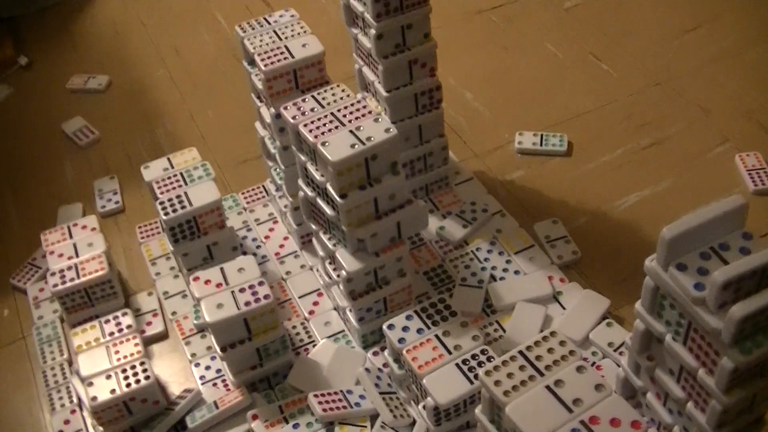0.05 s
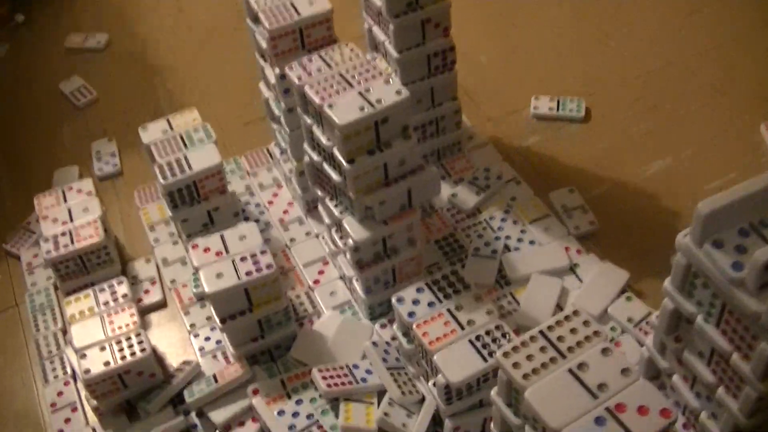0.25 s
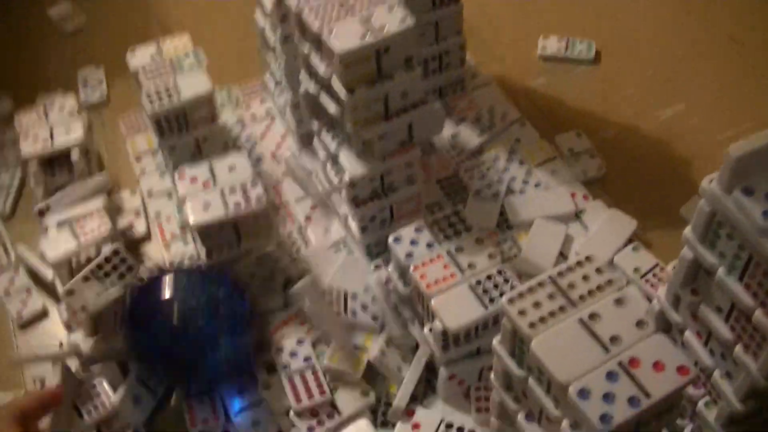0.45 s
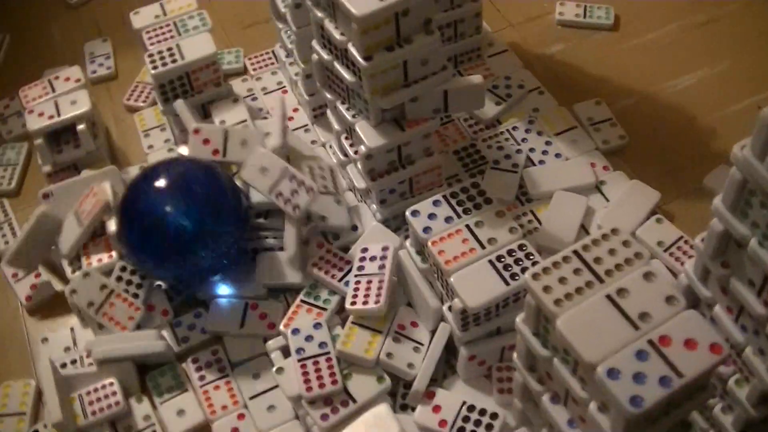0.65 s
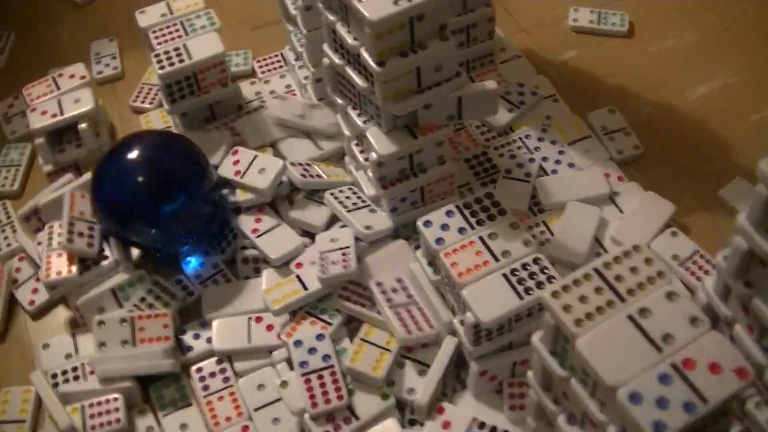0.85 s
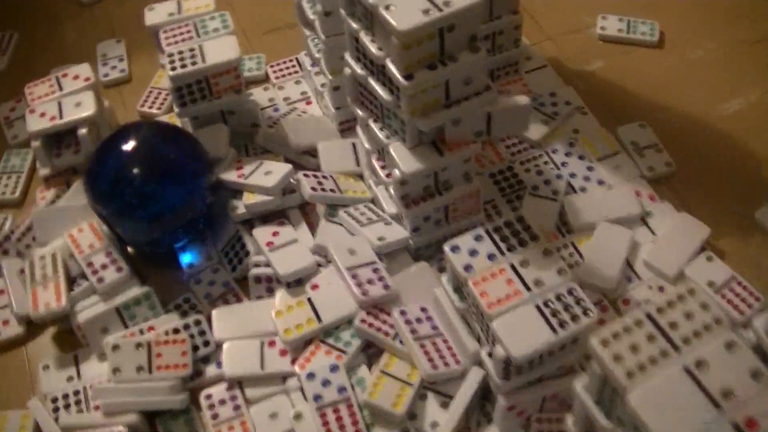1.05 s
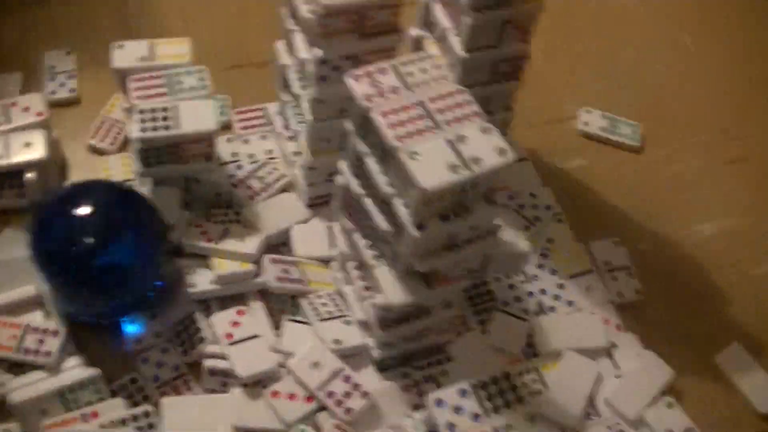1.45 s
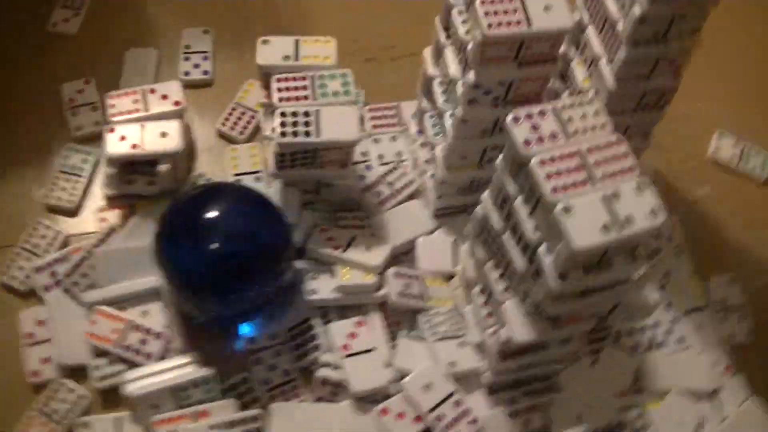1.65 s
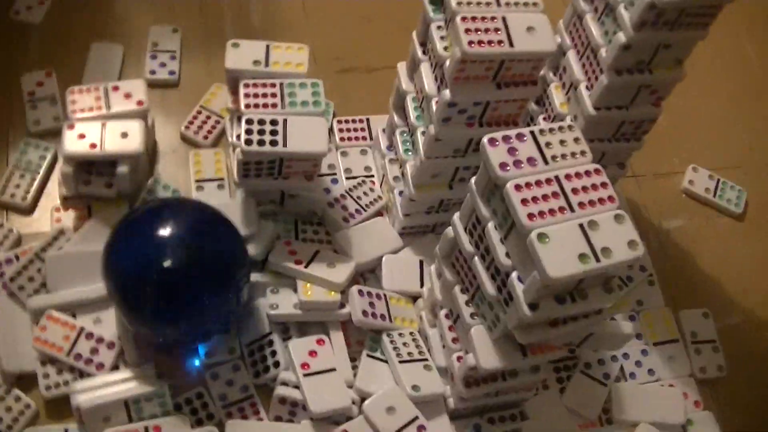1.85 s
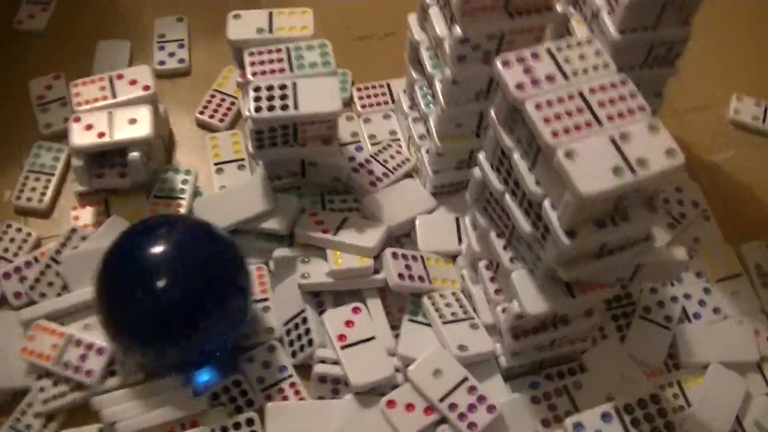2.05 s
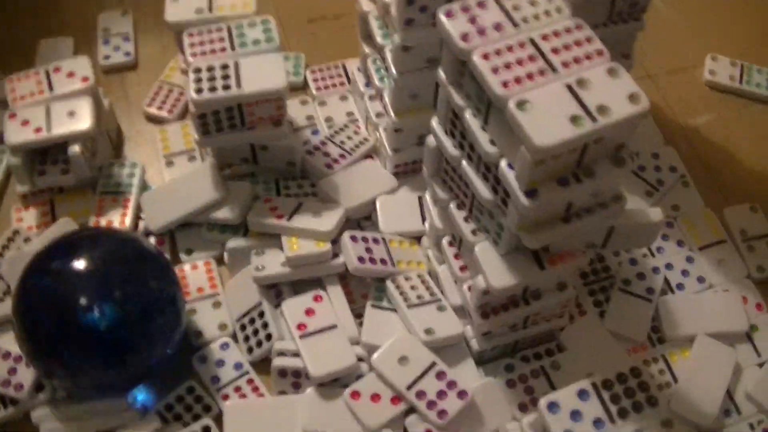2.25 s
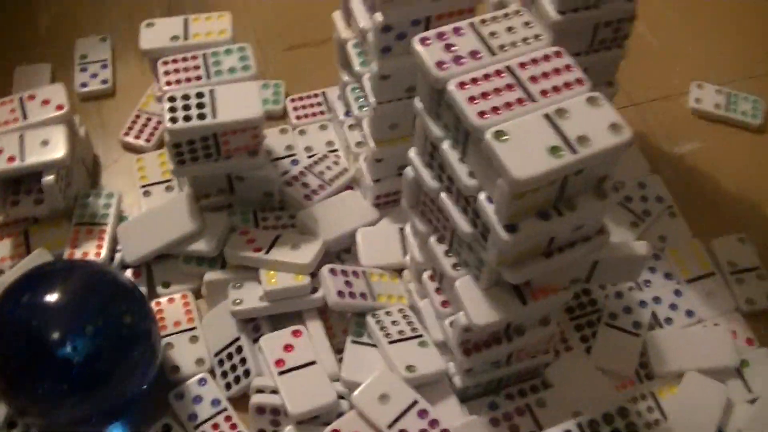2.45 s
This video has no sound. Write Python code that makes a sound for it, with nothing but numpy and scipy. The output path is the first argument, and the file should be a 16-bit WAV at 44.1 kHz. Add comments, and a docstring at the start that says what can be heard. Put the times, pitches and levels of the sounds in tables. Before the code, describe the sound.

Dominoes topple close by in a small room, starting with a few clicks and the low thud of a heavy ball at about 0.2 seconds. A dense, sharp clatter on the hard floor follows, thinning to separate clacks by 1.7 seconds. From 1.9 to 2.2 seconds a second stack falls with a thud. One stray tile clacks at 2.3 seconds, and a faint click follows near 2.6.

```python
"""A heavy ball is knocked into stacks of dominoes on a hard floor, close by in a small room.
First the blow excites the floor's low modes, and the stacks collapse in a dense clatter: each impact
radiates a broadband crack, the tiles ring at their high resonances and the room reverberates briefly.
The clatter thins to single clacks. At about 2 s a second stack falls with a thud; a few last tiles drop."""
import sys
import numpy as np
from scipy import signal
from scipy.fft import rfft, irfft
from scipy.io import wavfile

SR = 44100
rng = np.random.default_rng(int(sys.argv[2]) if len(sys.argv) > 2 else 0)


def pcm_store(signal):
    """Save signal as 16-bit PCM."""
    levels = np.round(np.clip(np.atleast_2d(signal), -1, 1) * 32767)
    wavfile.write(sys.argv[1], SR, levels.astype(np.int16).T)


N = 114660
TIME = np.arange(N) / SR
FREQUENCIES = np.fft.rfftfreq(N, 1 / SR)

# spectrum of the background hiss: (frequency [Hz], level [dB])
HISS_SPECTRUM = [(25,-9.5),(60,-0.5),(150,-1),(700,-19.5),(1500,-15.5),(3500,-9),(8000,-19),(16000,-22.5)]
# likeness of left and right in the direct sound: (frequency [Hz], correlation [-])
DIRECT_CORRELATION = [(150,0.51),(1300,1),(5000,0.94),(7000,0.65),(12000,0.05)]
# the same in the diffuse field: (frequency [Hz], correlation [-])
DIFFUSE_CORRELATION = [(150,0.93),(1400,1),(3000,0.75),(5000,0.91),(7000,0.23),(10000,0.72)]
# frequency response of the reverberation: (frequency [Hz], gain [dB])
ROOM_RESPONSE = [(1200,-6),(2400,1.5),(5800,0),(6600,-11),(8300,5),(10000,-5.5),(15000,-3)]
# bands of the impacts and the reverberation: (edge frequency [Hz])
BAND_EDGES = [150,400,850,1400,1950,2900,4000,5200,6500,7900,9300,12000,16500]
# envelope of the floor's rumble under ball and tiles: (time [s], level [dB])
RUMBLE_ENVELOPE = [(0,-70),(.15,-53),(.23,-41.5),(.42,-45.5),(.68,-69),(.76,-51),(1,-58.5),(1.93,-66.5),(2.02,-50.5),(2.17,-55.5),(2.32,-65.5),(2.6,-84.5)]
# spectrum of that rumble: (frequency [Hz], level [dB])
FLOOR_SPECTRUM = [(40,-34),(100,-15.5),(170,-0.5),(260,-5),(450,-9.5),(1200,-12.5),(4000,-65)]
# normal modes of the floor: (frequency [Hz], level [dB], T60 [s])
FLOOR_RESONANCES = [(154.5,-6.5,0.38),(188.3,-5.5,0.16),(243.4,-3,0.15),(298,-1.5,0.058),(379,-1,0.061),(529,3,0.032),(760,-6.5,0.029)]
# blows of the ball and falling stacks on the floor: (time [s], level [dB], extra knock [dB])
FLOOR_BLOWS = [(.234,-27,-14),(.275,-31.5,0.5),(0.323,-48.5,10),(0.739,-46,2.5),(1.839,-61,-9.5),(2.067,-30.5,4.5),(2.091,-41,3),(2.573,-51,-9)]
# weighting of the extra knock: (frequency [Hz], share [-])
KNOCK_WEIGHT = [(250,0.029),(400,1)]
# clustered resonances of loose tiles: (frequency [Hz], width [Hz], level [dB])
TILE_RESONANCES = [(4830,90,-9.5),(6996,186,-1),(8130,220,-2.5)]
# weighting of an impact's extra body: (frequency [Hz], share [-])
BODY_WEIGHT = [(2600,1),(4200,0)]
# weighting of an impact's extra brightness: (frequency [Hz], share [-])
BRIGHT_WEIGHT = [(5500,0.081),(7500,1),(9000,0.51),(13000,0.79)]
# course of the collapse: (time [s], level [dB], extra brightness [dB])
COLLAPSE_ENVELOPE = [(0,-61.5,2),(.07,-55.5,-8),(.11,-41,-2),(.155,-42,5),(.18,-29.5,-1),(.27,-31,3),(.31,-23,-8),(.335,-27,13),(.5,-22,3.5),(.66,-23.5,10),
                     (.87,-20.5,3),(1.0,-23.5,1),(1.09,-25,-6),(1.2,-25.5,1.5),(1.34,-30.5,-4),(1.48,-33.5,-10),(1.62,-48.5,-2),(1.668,-34.5,-13),(1.678,-33,16),(1.72,-40,3),(1.78,-56,3),
                     (1.9,-47,-13),(1.94,-29.5,-9),(2.04,-29.5,-11),(2.09,-25.5,0),(2.15,-36,-9),(2.2,-33.5,-10),(2.24,-80.5,-2),(2.6,-83,-7)]
# spectrum of a collision in the tumbling mass: (frequency [Hz], spectral density level [dB])
COLLAPSE_SPECTRUM = [(250,-25),(600,-19.5),(1100,-16),(1650,-10),(2400,-5.5),(3400,-2.5),(4600,0.5),(5800,3),(7200,-6),(8600,-9.5),(10700,-17),(14000,-27.5)]
# nearby tiles striking: (time [s], level [dB], extra body [dB], extra brightness [dB])
NEAR_IMPACTS = [(0.1254,-51,9.5,2),(0.1698,-35.5,9,1),(0.2308,-22,-2,0),(0.2756,-14.5,-13,-2.5),(0.2846,-14.5,-5,-8),(0.3101,-11,-9.5,-2),(0.3225,-17,4.5,8),
                (0.3811,-13.5,-31,-2),(0.389,-16,-18,-5),(0.4007,-13,-5,-3),(0.4204,-18.5,0,-5),(0.441,-15.5,-1,-1),(0.4586,-17,-24,-6),(0.4622,-16,-25,7),(.506,-21.5,6.5,14),(0.5182,-18,-5,6),
                (0.6171,-14.5,-9,-17),(0.7308,-24.5,9.5,10),(0.7892,-20.5,0,1),(0.9181,-13,-2.5,-3),(0.9565,-15.5,-6,-2),
                (0.9838,-22.5,-21,11),(1.0011,-20,-1,7),(1.0206,-12.5,-2,-19),(1.0527,-15,-1,0.5),(1.08,-25,-21,7),(1.092,-22,-4,-11),
                (1.1076,-16.5,1,-1.5),(1.136,-23,3,3),(1.1464,-18,-2.5,7),(1.152,-17,-2,5),(1.158,-17.5,-5,5.5),(1.1753,-15.5,-3.5,-14),(1.1908,-14.5,-4,-3),(1.2144,-17.5,0.5,-1),
                (1.248,-15.5,-2.5,2.5),(1.278,-18.5,0,7),(1.31,-18.5,-1,1),(1.3207,-17,0.5,-0.5),(1.3715,-14,-6.5,-9.5),
                (1.397,-22.5,-1,-9),(1.41,-15.5,-5.5,-5),(1.4447,-17,-8,-6),(1.4682,-24.5,-2.5,2),(1.5101,-30.5,-1,0.5),(1.522,-30.5,0,-4),(1.5497,-25,1.5,-13),
                (1.5665,-14.5,-4.5,-6),(1.6395,-25,-7.5,-31),(1.6617,-24,-2,-17),(1.6699,-23.5,0,8.5),(1.673,-14.5,-2,2.5),(1.8392,-35,1.5,-28.5),
                (1.86,-40,7,-23.5),(1.9166,-20,0,4.5),(1.9469,-13.5,-10,-5.5),(1.9706,-13,-5.5,0.5),(1.998,-29,8,-11),(2.0176,-14,0,-6.5),
                (2.0663,-18.5,7,-4),(2.0702,-12.5,-4.5,-0.5),(2.083,-22.5,7,-3),(2.0912,-15,-2.5,-4),(2.1,-21.5,-5,0),(2.12,-12,-12,-17),(2.1287,-20,1,-11),(2.1483,-12.5,-5.5,-7),
                (2.19,-20,-2.5,-33),(2.316,-22.5,4,-15.5),(2.574,-43.5,-1,-4)]
# spectrum of a nearby impact: (frequency [Hz], spectral density level [dB])
NEAR_SPECTRUM = [(250,-21.5),(600,-18.5),(1100,-13.5),(1650,-10),(2400,1),(3400,0.5),(4600,0),(5800,0),(7200,-6),(8600,-6.5),(10700,-21.5),(14000,-28.5)]
# short tones of a few hard clacks: (time [s], frequency [Hz], level [dB])
CLACK_TONES = [(0.3105,5300,-2.5),(0.3226,1150,-18),(1.9166,2630,-8.5),(2.1205,4950,-3),(2.3168,1150,-29),(2.3168,2090,-12.5),(2.3165,3950,-11.5),(2.3165,4870,-9)]
# balance of the microphones: (frequency [Hz], left minus right [dB])
MIC_BALANCE = [(200,-2),(700,0.8),(6200,-0.35),(8200,-7),(11000,-1)]


def from_db(db):
    """Amplitude ratio of a level in decibels."""
    return 10 ** (np.asarray(db) / 20)


def unit(x):
    """Normalisation to unit energy along time."""
    return x / np.sqrt(np.sum(x ** 2, axis=-1, keepdims=True) + 1e-20)


def at_hz(points, hz):
    """Interpolation on a logarithmic frequency axis."""
    f, value = np.transpose(points)
    return np.interp(np.log(np.maximum(hz, 1)), np.log(f), value)


def in_time(rows, t):
    """Linear interpolation of each column at the times t."""
    times, *columns = np.transpose(rows)
    return [np.interp(t, times, column) for column in columns]


def decay(t, t60):
    """Exponential damping: 60 dB in t60 seconds."""
    return np.exp(-np.log(1000) * t / t60)


def colour(x, spectrum, share=1):
    """Zero-phase filtering by a curve in decibels."""
    return irfft(rfft(x) * from_db(share * at_hz(spectrum, FREQUENCIES)), N)


def left_right(mid, side, correlation):
    """Sum and difference of independent signals give a partly correlated pair."""
    return np.sqrt((1 + correlation) / 2) * mid + np.sqrt((1 - correlation) / 2) * side * [[1], [-1]]


def stereo_noise(correlation):
    """White noise whose coherence between the sides depends on frequency."""
    mid, side = rfft(rng.standard_normal((2, N)))
    return irfft(left_right(mid, side, at_hz(correlation, FREQUENCIES)), N)


def steady_noise(spectrum):
    """Stationary coloured noise of unit rms."""
    return unit(colour(stereo_noise(DIRECT_CORRELATION), spectrum)) * np.sqrt(N)


def superpose(times, sounds):
    """Linear superposition of short sounds, each from its onset."""
    out = np.zeros((2, N))
    for start, sound in zip((np.clip(times, 0, TIME[-1]) * SR).astype(int), sounds):
        out[:, start:start + sound.shape[-1]] += sound[:, :N - start]
    return out


def background(hiss_db=-58.5, tick_period_s=.0333, tick_hz=370):
    """Stationary hiss and a periodic train of damped sinusoids, heard as faint, low ticking."""
    since = (TIME + tick_period_s / 5) % tick_period_s
    ticks = np.sin(2 * np.pi * tick_hz * since) * decay(since, t60=.015)
    swell = from_db(np.linspace(-59, -49, N))
    return from_db(hiss_db) * steady_noise(HISS_SPECTRUM) + swell * ticks


def room_reverberation(sound, onset_s=.001):
    """Diffuse field: reflections from scattered tiles merge into a tail following each band's energy."""
    noise = rfft(stereo_noise(DIFFUSE_CORRELATION))
    source = rfft(sound.sum(0) / np.sqrt(2))
    edges, t, out = np.array(BAND_EDGES), TIME[:SR // 2], 0
    centres = np.sqrt(edges[1:] * edges[:-1])
    in_range = (FREQUENCIES > edges[0]) & (FREQUENCIES < edges[-1])
    energy_decay = unit(decay(t, t60=.21) * (1 - np.exp(-t / onset_s))) ** 2
    for pick in np.eye(len(centres)):
        band = np.sqrt(np.interp(FREQUENCIES, centres, pick)) * in_range
        power = np.abs(signal.fftconvolve(irfft(source * band, N) ** 2, energy_decay)[:N])
        out += np.sqrt(power * N) * unit(irfft(noise * band ** 2, N))
    return colour(out, ROOM_RESPONSE)


def floor_rumble():
    """Forced vibration: the floor radiates low noise under the moving ball and tiles."""
    return from_db(in_time(RUMBLE_ENVELOPE, TIME)[0]) * steady_noise(FLOOR_SPECTRUM)


def floor_thuds():
    """Impulse response: heavy blows excite the floor's damped modes; hard ones favour the upper modes."""
    times, db, knock_db = np.transpose(FLOOR_BLOWS)
    hz, mode_db, t60 = np.transpose(FLOOR_RESONANCES)[:, :, None]
    t = TIME[:SR // 2]
    modes = from_db(mode_db) * np.cos(2 * np.pi * hz * t) * decay(t, t60)
    scatter_db = rng.standard_normal((len(times), len(hz)))
    strength = from_db(db[:, None] + knock_db[:, None] * at_hz(KNOCK_WEIGHT, hz.T) + scatter_db)
    return superpose(times, (strength @ modes)[:, None])


def tile_ring(clatter):
    """Resonance: nearly identical tiles store the clatter's energy and release it in narrow bands."""
    noise = rfft(stereo_noise(DIFFUSE_CORRELATION))
    source, out = rfft(clatter.sum(0)), 0
    energy_decay = unit(decay(TIME[:SR // 2], t60=.15)) ** 2
    for centre, width, db in TILE_RESONANCES:
        detuning = FREQUENCIES - centre
        drive = irfft(source * np.exp(-(detuning / (centre / 10)) ** 2), N)
        power = np.abs(signal.fftconvolve(drive ** 2, energy_decay)[:N])
        cluster = unit(irfft(noise * np.exp(-(detuning / width) ** 2), N))
        out += from_db(db) * np.sqrt(power * N) * cluster
    return out


def impacts(times, db, body_db, bright_db, spectrum, crack_t60, chatter_t60, chatter_db):
    """Brief contact gives a broad spectrum: each tile cracks, rebounds and chatters."""
    rebound_s, rebound_db, pan_spread_db = .0016, -6, .47
    t, sounds = TIME[:640], 0
    draws = rng.standard_normal((len(times), 4, len(t)))
    pan = from_db(pan_spread_db * draws[:, :1, -1:] * [[1], [-1]])
    since_rebound = t - rebound_s * np.abs(draws[:, 2:3, -1:])
    rebound = from_db(rebound_db) * (since_rebound > 0) * decay(np.abs(since_rebound), crack_t60)
    chatter = from_db(chatter_db) * decay(t, chatter_t60)
    bursts = draws * (decay(t, crack_t60) + rebound + chatter)
    for k, (low, high) in enumerate(zip(BAND_EDGES, BAND_EDGES[1:])):
        hz = np.sqrt(low * high)
        bandpass = signal.butter(2 + (low > 1000), [low, high], "band", fs=SR, output="sos")
        band = unit(signal.sosfilt(bandpass, bursts[:, k % 2::2]))  # adjacent bands are independent
        pair = left_right(band[:, :1], band[:, 1:], at_hz(DIRECT_CORRELATION, hz))
        tone_db = body_db * at_hz(BODY_WEIGHT, hz) + bright_db * at_hz(BRIGHT_WEIGHT, hz)
        scatter_db = draws[:, 1, -1 - k]
        gain = from_db(db + at_hz(spectrum, hz) + tone_db + scatter_db)
        sounds += pair * gain[:, None, None] * np.sqrt((high - low) / 20)
    return superpose(times, sounds * pan)


def tumbling_tiles(peak_per_s=750, sparsest_share=.35, level_spread_db=4.5, tone_spread_db=3.5):
    """Incoherent summation: hundreds of random collisions a second add in power to form the clatter."""
    jitter, size, body, bright = rng.standard_normal((3000, 4)).T
    times = (np.arange(len(jitter)) + jitter) / peak_per_s
    db, bright_db = in_time(COLLAPSE_ENVELOPE, times)
    share = np.clip(from_db(db - db.max()), sparsest_share, 1)  # a weaker collapse is sparser
    falls = (times > 0) & (times < TIME[-1]) & (np.diff(np.floor(np.cumsum(share)), prepend=0) > 0)
    db -= 10 * np.log10(share)  # fewer collisions each carry more of the power
    db += level_spread_db * np.minimum(size, 1.5) - 9.5
    bright_db += tone_spread_db * bright
    return impacts(times[falls], db[falls], tone_spread_db * body[falls], bright_db[falls],
                   COLLAPSE_SPECTRUM, crack_t60=.0035, chatter_t60=.027, chatter_db=-15.5)


def near_clacks():
    """Impact sound of single tiles close by; free vibration adds a short tone to a few."""
    cracks = impacts(*np.transpose(NEAR_IMPACTS), NEAR_SPECTRUM,
                     crack_t60=.004, chatter_t60=.022, chatter_db=-13)
    times, hz, db = np.transpose(CLACK_TONES)[:, :, None]
    t = TIME[:SR // 20]
    envelope = decay(t, t60=.011) * (1 - np.exp(-hz * t))
    tones = from_db(db) * np.sin(2 * np.pi * hz * t) * envelope
    return cracks + superpose(times[:, 0], tones[:, None])


def scene():
    """Superposition of the tiles' direct sound, their ringing, the floor, the room and the background."""
    near, mass = near_clacks(), tumbling_tiles()
    ring = tile_ring(mass + from_db(-5.5) * near)
    floor = floor_thuds() + floor_rumble()
    reverberation = room_reverberation(from_db(-10) * near + from_db(-2) * mass)
    return near + mass + ring + floor + reverberation + background()


def record(dry, clip_level=.94, cutoff_hz=16000):
    """Transduction: the right microphone is brighter, saturation rounds peaks, a low-pass cuts the top."""
    heard = colour(dry, MIC_BALANCE, share=np.array([[.5], [-.5]]))
    rounded = heard / (1 + (heard / clip_level) ** 8) ** (1 / 8)
    return signal.sosfilt(signal.ellip(10, .2, 70, cutoff_hz, fs=SR, output="sos"), rounded)


dry = scene()
out = record(dry)
pcm_store(out)
```